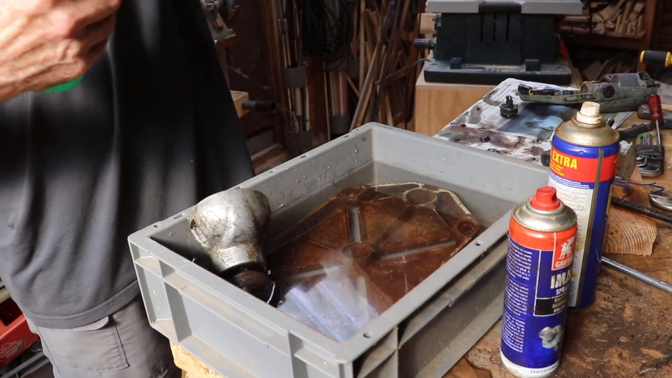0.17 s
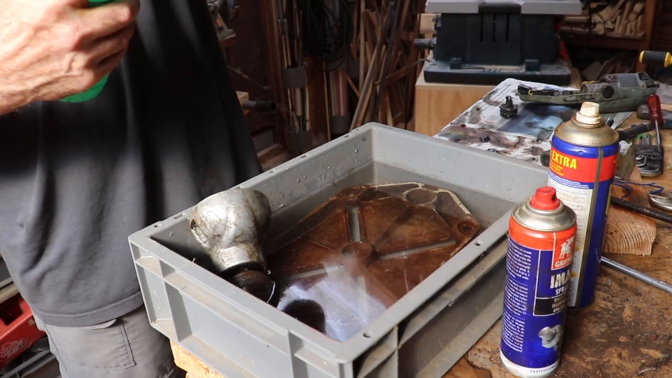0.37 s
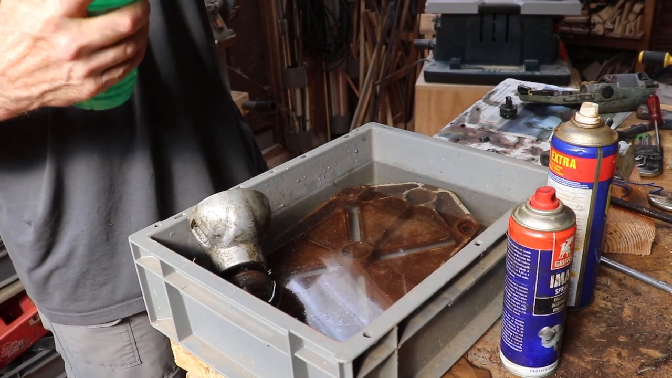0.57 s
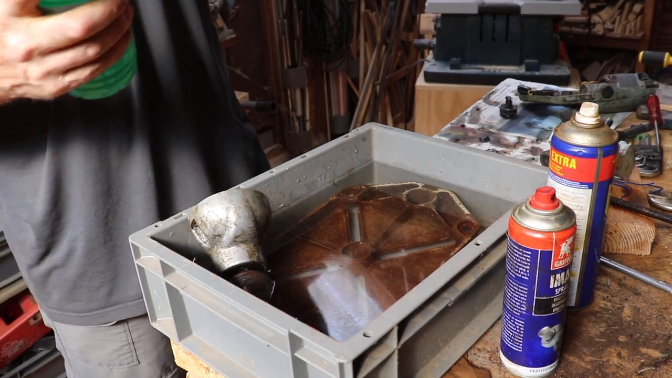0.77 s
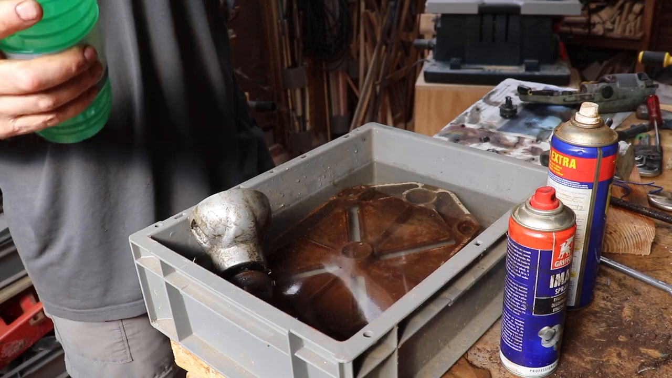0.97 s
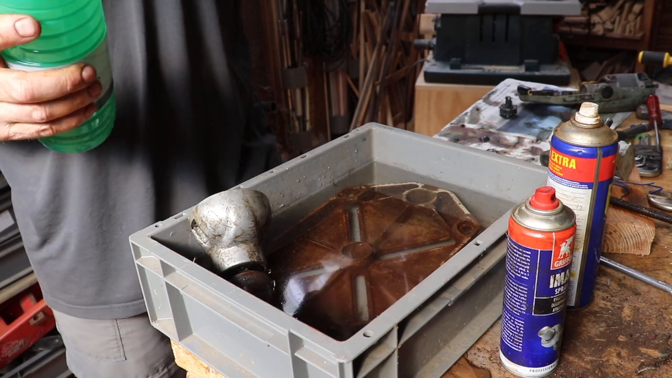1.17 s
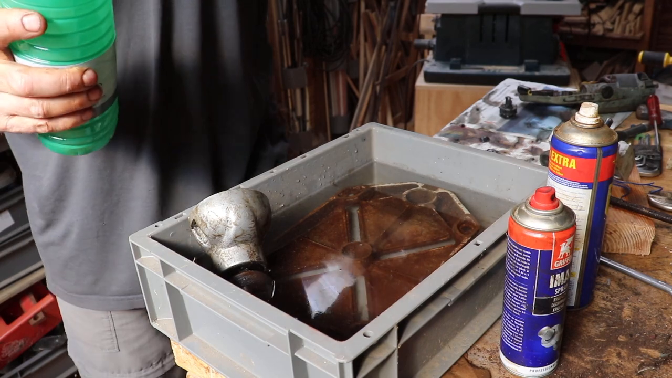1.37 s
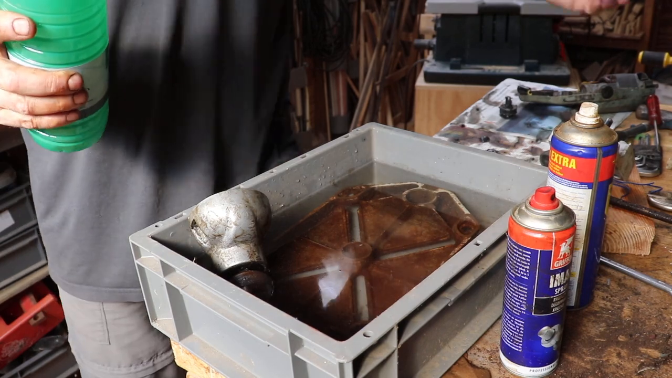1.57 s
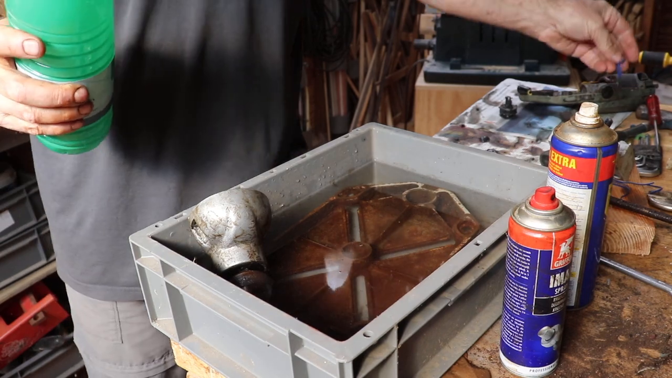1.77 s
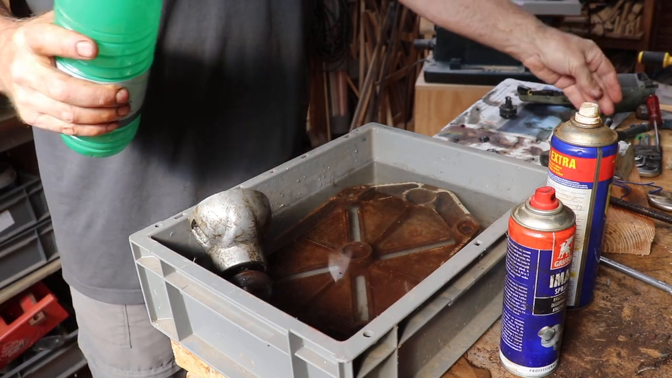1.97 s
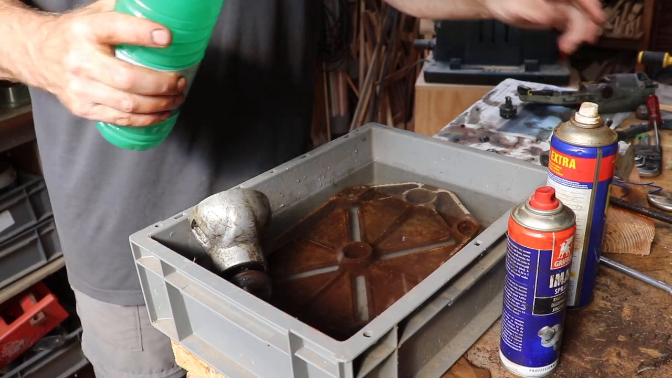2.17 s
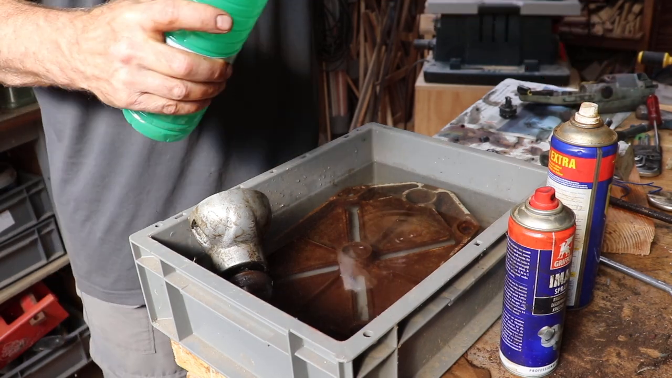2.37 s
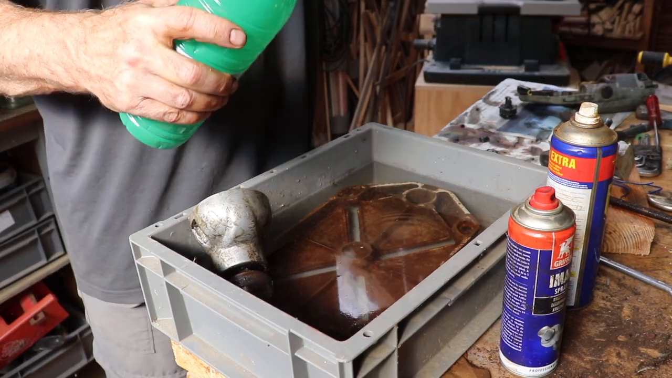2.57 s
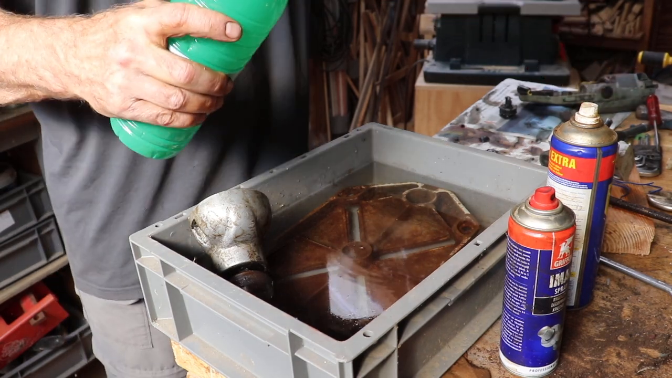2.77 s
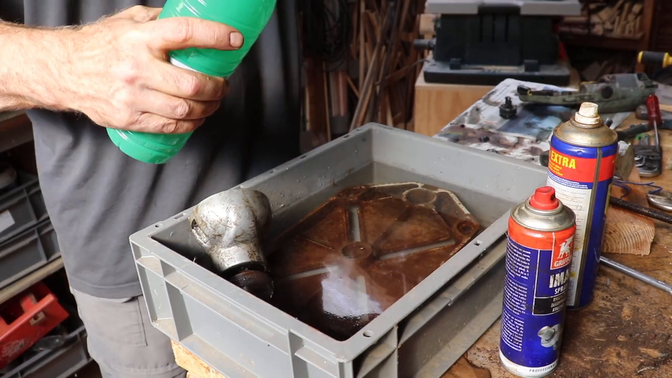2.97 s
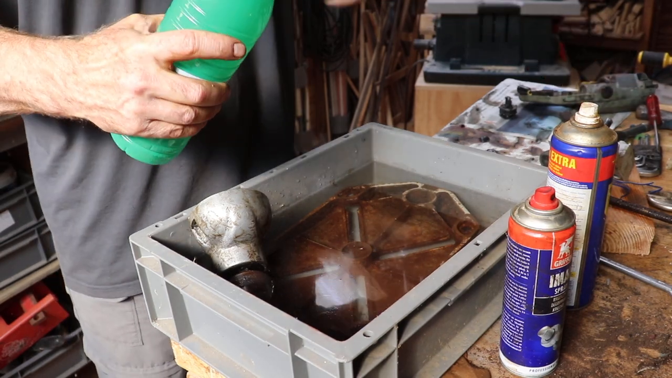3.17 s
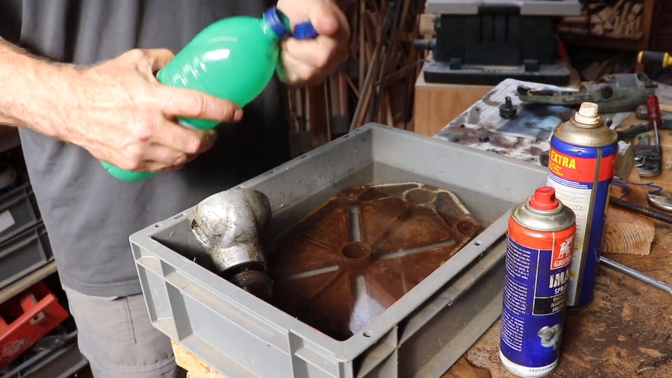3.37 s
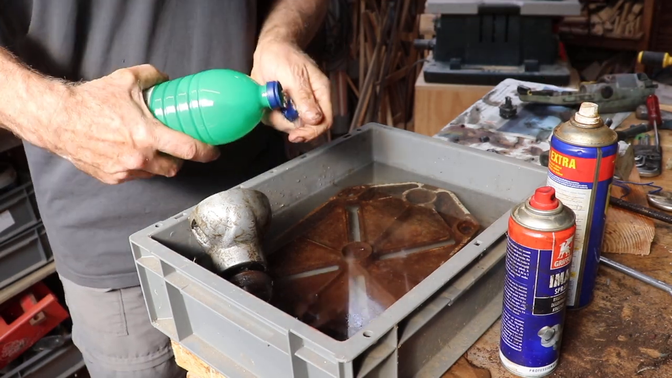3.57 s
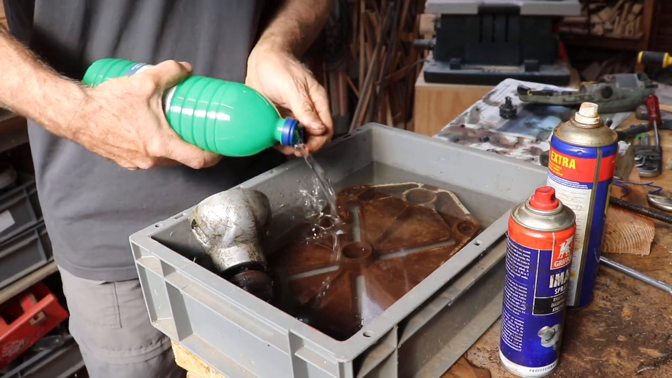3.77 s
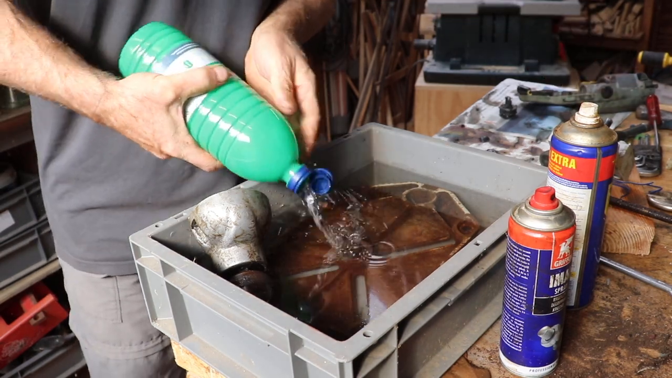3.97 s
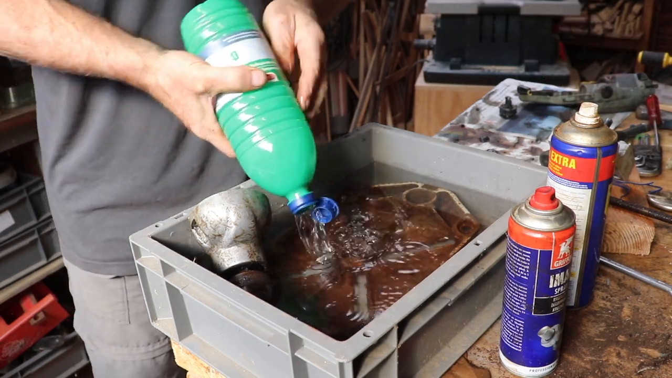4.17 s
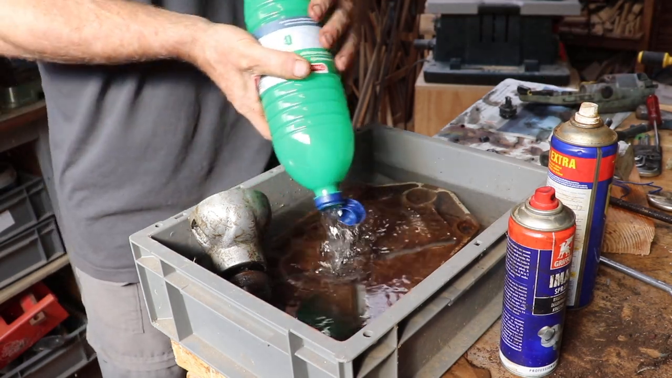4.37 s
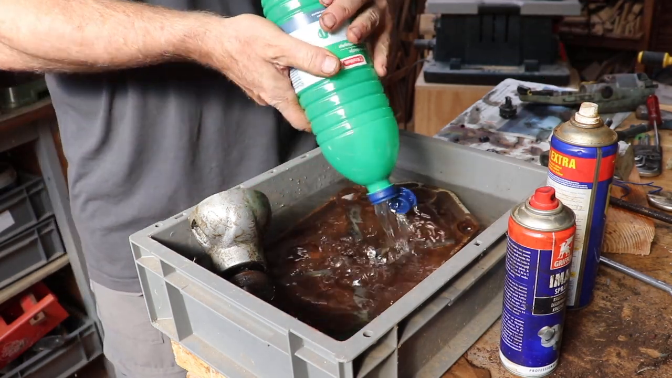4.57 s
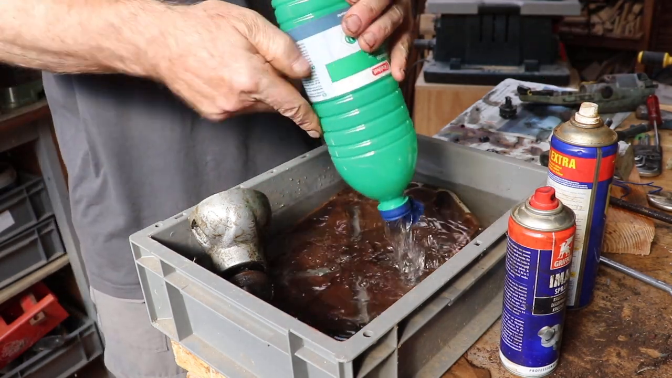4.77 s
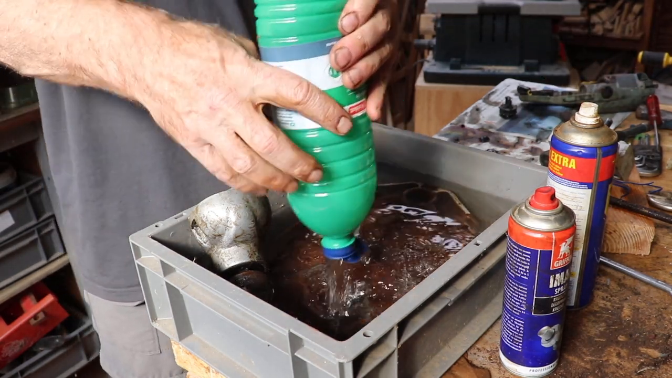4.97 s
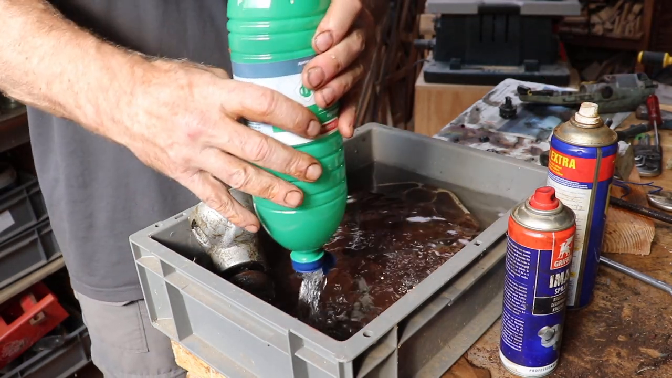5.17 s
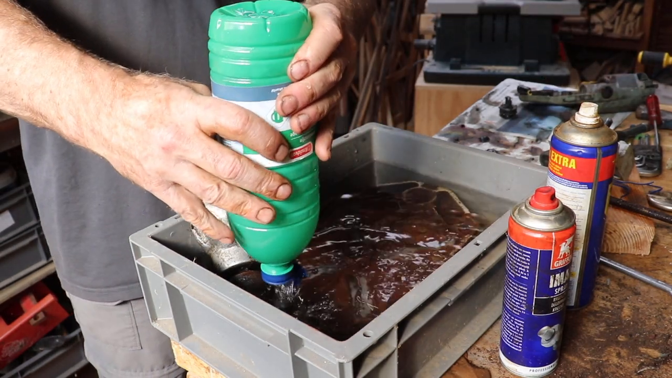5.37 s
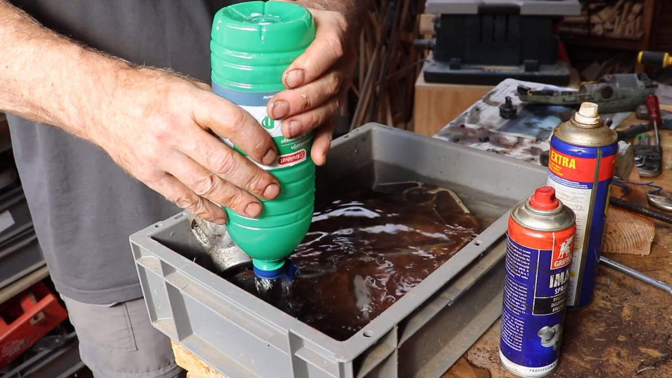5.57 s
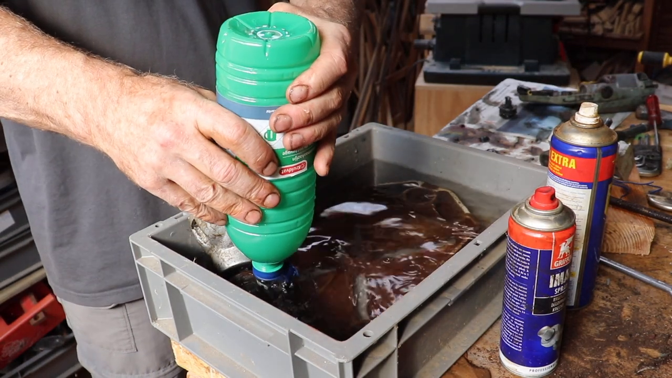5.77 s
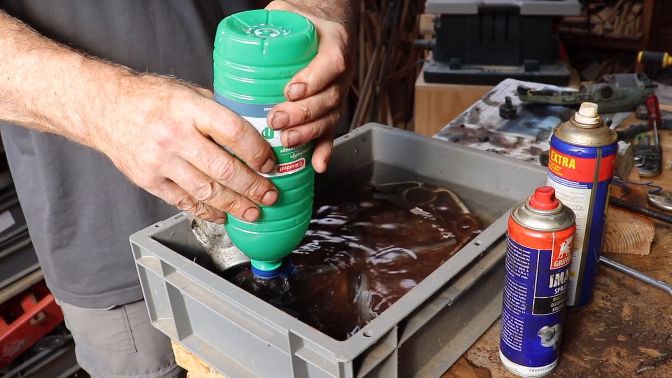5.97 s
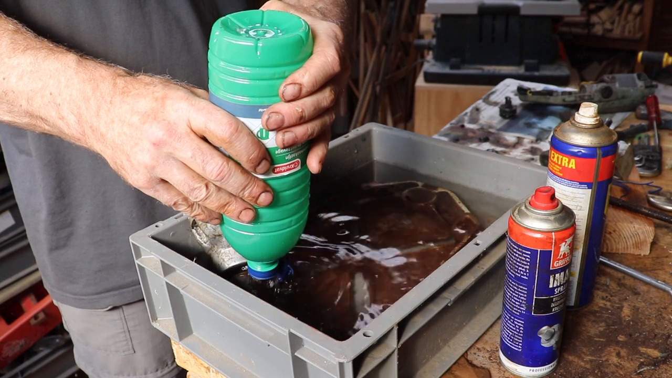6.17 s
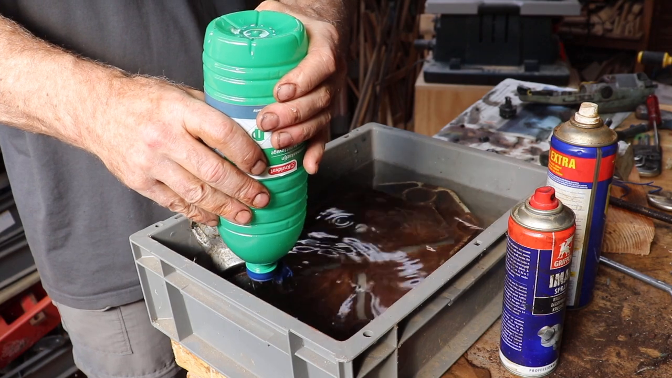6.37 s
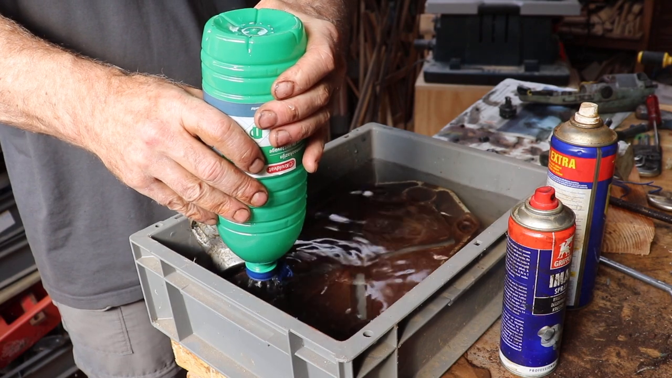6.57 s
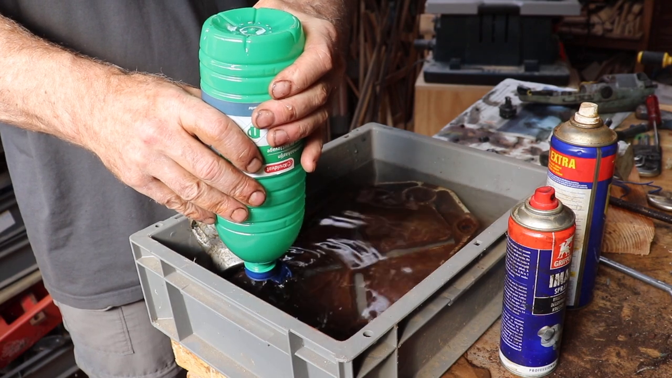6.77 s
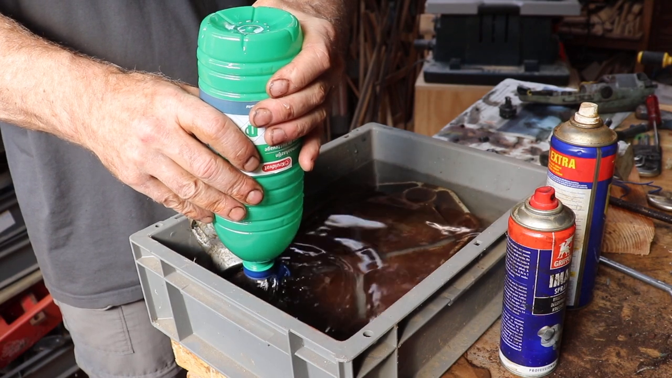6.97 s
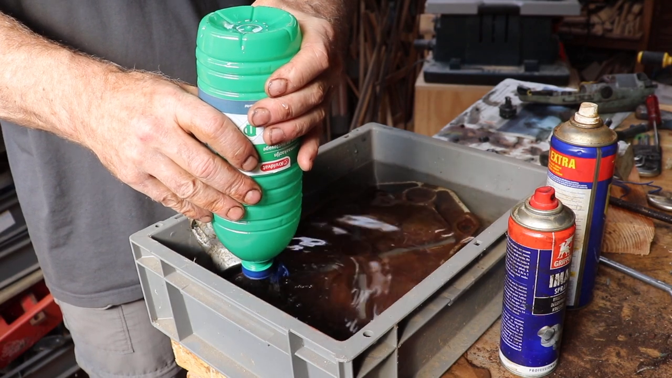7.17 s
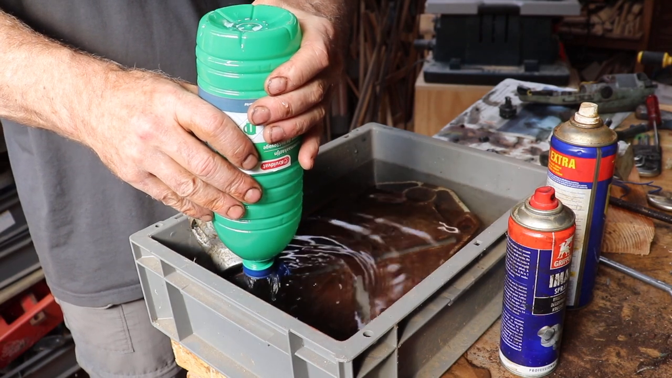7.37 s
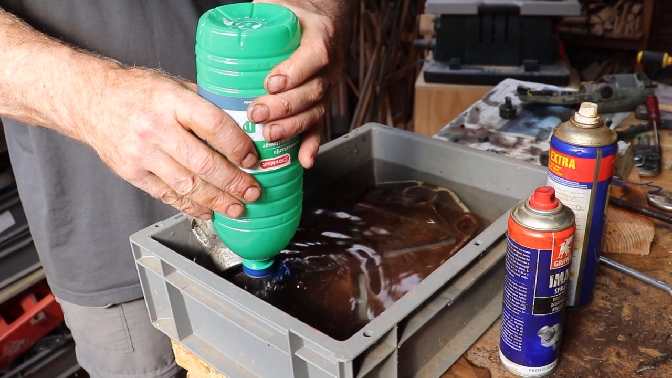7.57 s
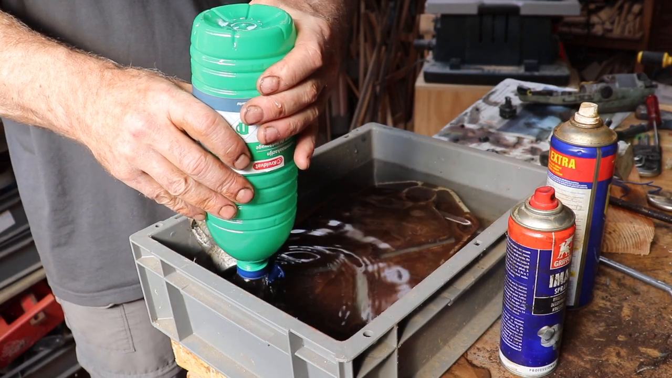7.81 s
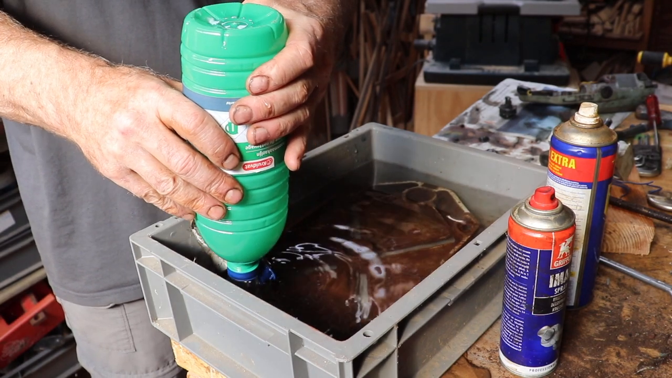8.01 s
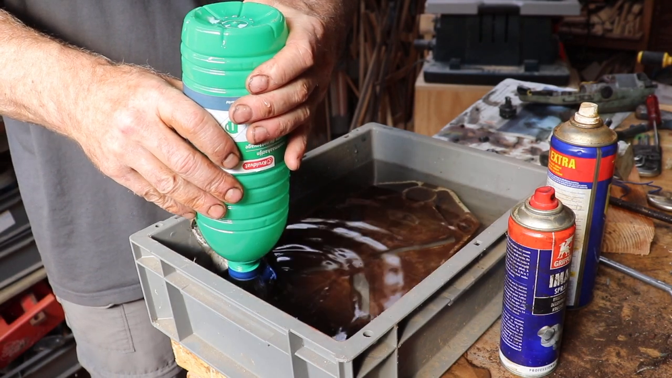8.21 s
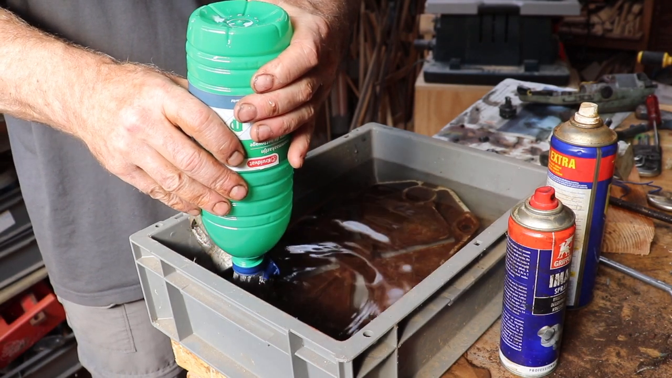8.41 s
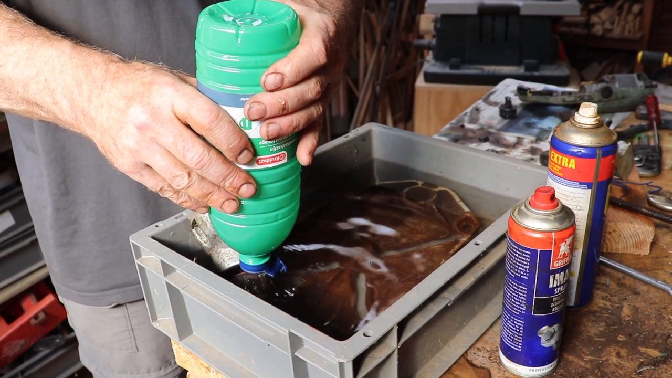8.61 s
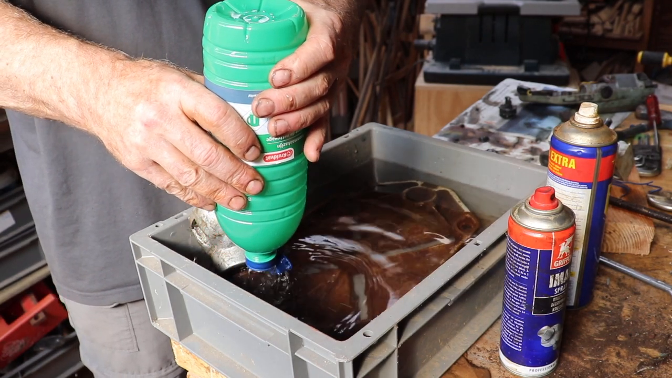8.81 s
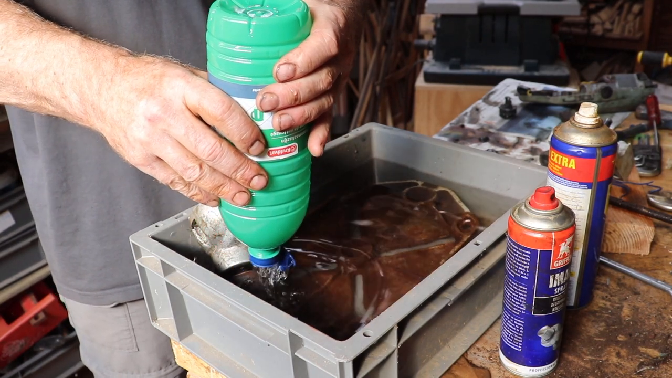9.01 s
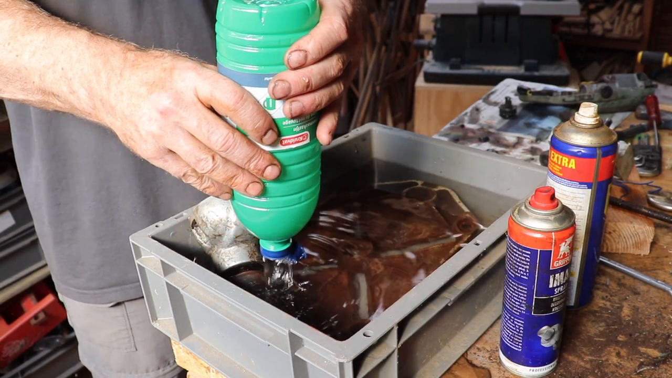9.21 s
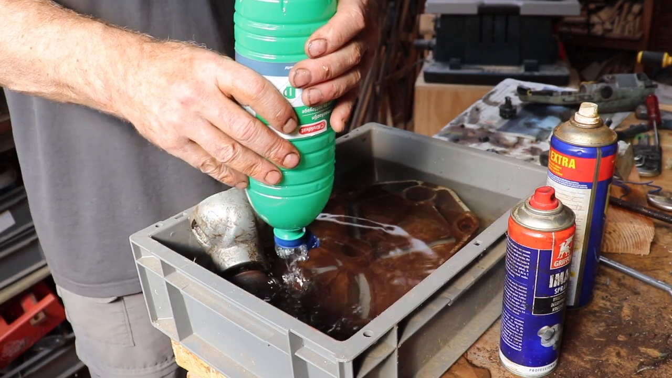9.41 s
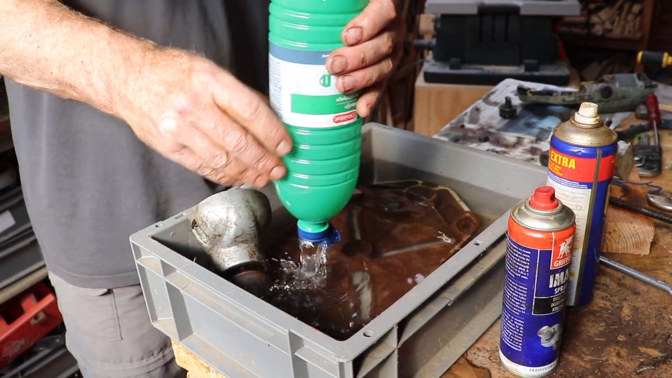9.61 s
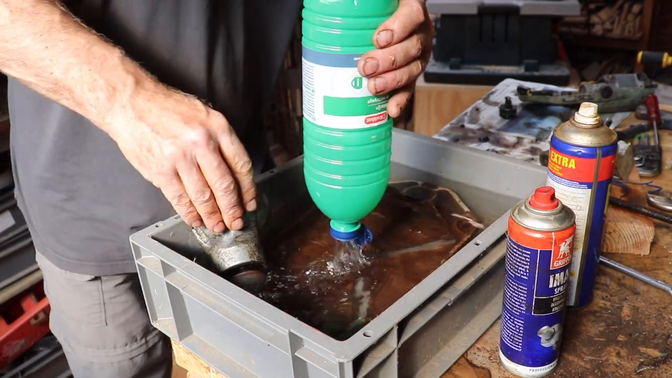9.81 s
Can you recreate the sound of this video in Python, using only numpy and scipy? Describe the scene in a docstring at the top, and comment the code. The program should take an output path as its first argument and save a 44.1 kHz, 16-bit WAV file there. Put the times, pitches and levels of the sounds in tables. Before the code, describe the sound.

Over faint workshop air, hands softly rub and bump a plastic bottle. Between about 0.5 and 0.9 seconds come a dull knock and several dry clicks as the cap is worked. More rubbing follows around 2.6 seconds, then a hollow knock at 2.8, a sharp crack of buckling plastic at 3, and two light taps.

At about 3.8 seconds liquid starts falling into a crate already holding liquid, building to a splashing stream with bright spatter, strongest from 4.2 to 5.4. The bottle cracks again near 5.8. From about 5.5 the pour becomes uneven glugging, several gulps a second, with low notes, wet slaps and ringing bubbles. From 8.6 it turns a little splashier and keeps glugging until the end, near 10 seconds. The crate rings faintly along with the liquid. The room is small and fairly dry, heard through a stereo pair of microphones.

```python
"""Bottle emptied into a crate

A small workshop, on a stereo pair of microphones. A plastic bottle is handled and unscrewed, then
upturned over a crate that holds liquid. The stream splashes from a height; with the neck lowered to
the surface it glugs: air gulps set a low note ringing, slugs of liquid slap down and bubbles ring.
The air in the crate rings along, and nearby walls and clutter answer briefly."""
import sys
import numpy as np
from scipy import signal
from scipy.fft import rfft, irfft, next_fast_len
from scipy.io import wavfile
from scipy.ndimage import map_coordinates

SR = 44100
rng = np.random.default_rng(int(sys.argv[2]) if len(sys.argv) > 2 else 0)


def file_out(sig):
    """Save sig as 16-bit WAV at sys.argv[1]."""
    # one column per channel
    cols = np.atleast_2d(sig).T
    # limit, then scale
    lim = np.clip(cols, -1, 1)
    pcm = np.round(lim * 32767).astype(np.int16)
    wavfile.write(sys.argv[1], SR, pcm)


N = 434385

# Noise colours. Each row: frequency in Hz, relative level in dB.
AIR_SPECTRUM = [(60, -4), (140, -7), (260, -12.5), (470, -17.5), (1100, -15.5), (2600, -14), (8000, -18),
                (16000, -29)]  # still workshop air
RUMBLE_SPECTRUM = [(60, -4), (180, -26), (900, -90)]  # the room's low rumble
BUMP_SPECTRUM = [(80, -5), (200, -3), (380, -3), (600, -7), (1000, -9.5), (2500, -25.5), (6000, -70)]  # hands against the bottle
RUB_SPECTRUM = [(600, -13), (2000, -1), (3000, 2.5), (5000, 0), (7500, 1.5), (11000, -1.5), (16000, -15)]  # fingers and cap sliding on plastic
CHURN_SPECTRUM = [(80, -47), (190, 6), (300, -5), (430, -8), (600, -0.5), (900, -0.5), (1800, -13.5)]  # deep churning in the pool
SPLASH_SPECTRUM = [(150, -62), (450, 3), (950, -5.5), (2000, -1.5), (3500, 1), (5000, -9.5), (9000, -4.5)]  # the stream hitting the surface
SPRAY_SPECTRUM = [(600, -65), (2500, -14.5), (5800, -2.5), (8000, -4.5), (11000, -4), (16000, -22)]  # fine drops thrown up
# The rumble's slow drift. Each row: time in seconds, level in dB.
RUMBLE_LEVELS = [(0, -57), (2.3, -61.5), (4.8, -52), (8.8, -66), (9.85, -62)]
# The workshop's decay. Each row: frequency in Hz, time to fall 60 dB in seconds.
ROOM_T60 = [(150, 0.17), (500, 0.18), (1400, 0.17), (3700, 0.16), (10000, 0.14), (16000, 0.059)]
# Diffuse sound at the pair. Each row: frequency in Hz, left-right correlation.
MIC_CORRELATION = [(60, 0.85), (300, 0.86), (1000, 0.35), (2500, 0), (6000, 0)]
# The microphones' colour. Each row: frequency in Hz, left minus right in dB.
MIC_BALANCE = [(500, 0), (2000, -1), (5000, -0.5), (12000, 1.5)]

# Hands bumping the bottle. Each row: time in seconds, relative level in dB.
BUMP_LEVELS = [(0, -39), (0.1, -44), (0.35, -46), (0.9, -42), (1.3, -50.5), (1.6, -45.5), (2.45, -50),
               (2.75, -49), (3.5, -47), (3.9, -51)]
# Strokes of fingers and cap. Each row: middle in seconds, length in seconds, level in dB.
RUBS = [(0.01, 0.059, -40.5), (0.179, 0.1, -43), (0.308, 0.073, -47.5), (0.662, 0.031, -35),
        (1.563, 0.025, -48.5), (2.57, 0.028, -40), (2.624, 0.039, -37.5), (2.72, 0.064, -40),
        (3.214, 0.014, -35), (3.6, 0.031, -40.5)]
# Snaps of plastic. Each row: start in seconds, ring pitch in Hz, ring, thud and tick levels in dB.
CLICKS = [(0.478, 1800, -40, -39, -38.5), (0.604, 2570, -37.5, -59, -58), (0.644, 2530, -31, -35.5, -22),
          (0.688, 2510, -37.5, -43, -39), (0.9152, 2270, -40.5, -45, -51), (3.215, 3180, -34.5, -42, -37),
          (3.361, 2330, -45, -70, -41)]  # dry clicks
WALL_CRACKS = [(3.0384, 1990, -12, -18.5, -21.5), (3.0411, 2120, -24, -31, -30),
               (5.75, 3400, -13.5, -23.5, -32), (5.7524, 3200, -16.5, -29.5, -36)]  # the bottle's wall buckling
# Dull knocks. Each row: start in seconds, level in dB, cut-off in Hz (low for a soft contact).
KNOCKS = [(0.454, -28, 610), (1.565, -41.5, 2000), (2.801, -25.5, 3970), (2.813, -28.5, 3000),
          (2.823, -29, 3000), (2.848, -35, 2000)]
# Resonances. Each row: frequency in Hz, width in Hz, gain in dB.
BODY_MODES = [(224, 144, -1.5), (402, 90, 2.5), (680, 300, -1.5), (930, 180, 3.5), (1270, 130, 2),
              (2230, 6000, -12.5)]  # the knocked body
CRATE_MODES = [(461.5, 24, 5.5), (655, 16, 2.5), (820, 41, 4), (920, 66, -2.5), (1130, 65, -9),
               (1326, 83, -5.5)]  # the air in the crate
# Light taps on a ringing part. Each row: start in seconds, level in dB.
TAPS = [(3.211, -43), (3.363, -38.5)]
# That part's modes. Each row: frequency in Hz, gain in dB, time to fall 60 dB in seconds.
TAP_MODES = [(813, 3, 0.1), (2400, 11.5, 0.013), (2860, -1, 0.013)]

# The steady stream. Each row: time in seconds, level in dB.
FLOW_LEVELS = [(3.8, -45), (4.05, -39.5), (4.6, -42.5), (5.0, -42.5), (5.3, -34), (5.55, -49), (6.1, -41),
               (6.45, -50), (6.9, -47.5), (7.45, -53), (8.2, -48.5), (8.8, -53), (9.3, -49), (9.85, -46)]
# The neck's distance from the pool. Each row: time in seconds, height in cm.
NECK_HEIGHT = [(3.7, 1.7), (4.7, 6.3), (5.3, 4.2), (6.0, 0.53), (8.0, 0.73), (8.7, 5), (9.1, 1.3),
               (9.85, 8)]
# Slugs plunging in. Each row: start in seconds, hold in seconds, splash level in dB, churn level in dB.
GUSHES = [(4.196, 0.095, -43, -39), (4.401, 0.12, -37.5, -47), (4.666, 0.07, -37, -40),
          (4.755, 0.15, -38.5, -47.5), (5.086, 0.02, -36, -45), (5.444, 0.034, -39.5, -42),
          (5.639, 0.014, -54, -33), (5.753, 0.067, -38.5, -40.5), (6.005, 0.06, -45, -33.5),
          (6.166, 0.11, -39, -38), (6.728, 0.0073, -41.5, -40.5), (6.814, 0.029, -44, -43.5),
          (6.948, 0.013, -41.5, -39.5), (7.502, 0.022, -41.5, -44), (7.733, 0.036, -35.5, -45),
          (8.062, 0.042, -45.5, -43), (8.284, 0.061, -45, -45.5), (8.582, 0.026, -39.5, -36),
          (8.876, 0.11, -47, -49), (9.033, 0.093, -40.5, -47), (9.622, 0.064, -41, -52)]
# Spatter landing on the pool. Each row: start in seconds, pitch in Hz, level in dB.
SPATTERS = [(4.243, 6500, -17), (4.371, 6300, -22), (5.172, 4680, -21), (5.471, 5180, -21),
            (5.848, 6050, -22.5), (6.279, 2800, -23), (6.478, 4940, -30.5), (6.738, 5400, -30),
            (6.754, 6240, -28), (6.838, 4550, -27), (7.2058, 7500, -29.5), (7.241, 8300, -28),
            (7.287, 8000, -27), (7.4885, 8000, -27), (7.919, 3050, -31), (7.863, 6650, -30.5),
            (8.628, 4960, -26), (8.88, 8700, -25), (9.035, 4770, -20.5), (9.127, 4430, -26),
            (9.161, 3740, -24.5), (9.247, 7150, -26), (9.408, 6000, -25.5), (9.634, 5370, -30),
            (9.665, 4270, -21.5), (9.765, 4320, -27.5), (9.801, 5640, -24)]
# Liquid slapping the surface. Each row: start in seconds, ring pitch in Hz, ring level in dB.
SLAPS = [(3.815, 4900, -35.5), (3.906, 2410, -28), (3.922, 2840, -25), (4.28, 3050, -26),
         (4.332, 5500, -28.5), (4.3578, 5300, -25), (4.474, 3600, -19), (4.62, 2800, -18.5),
         (4.688, 3140, -19), (4.695, 2560, -17.5), (4.71, 2040, -19), (4.86, 1340, -18.5),
         (4.9926, 2880, -20.5), (5.112, 2480, -17.5), (5.429, 1110, -26.5), (5.537, 2680, -28.5),
         (6.207, 1470, -26), (6.228, 1380, -29), (6.766, 910, -26.5), (6.913, 2360, -27),
         (7.501, 2180, -38), (7.708, 3950, -29.5), (7.756, 2050, -18), (8.273, 1280, -29),
         (8.403, 1880, -31.5), (8.457, 2700, -29), (8.502, 4200, -27.5), (8.211, 4200, -33.5),
         (8.3153, 3230, -30.5), (8.672, 3980, -34.5), (9.359, 4860, -35), (9.588, 1660, -24.5),
         (9.611, 1730, -21.5)]
# Air dragged under. Each row: start in seconds, length in seconds, lowest pitch in Hz, relative dB.
CHIRPS = [(4.176, 0.042, 1047, -32), (4.212, 0.05, 1747, -32), (4.416, 0.022, 2285, -24.5),
          (4.593, 0.03, 2590, -29), (4.642, 0.014, 2950, -21), (4.774, 0.017, 2410, -26),
          (4.793, 0.027, 1965, -23.5), (5.626, 0.044, 660, -32), (6.015, 0.06, 800, -26)]
# Runs of growing bubbles. Each row: start and length in seconds, first and last pitch in Hz, level in dB.
GURGLES = [(5.273, 0.056, 1200, 770, -35.5), (5.649, 0.026, 1200, 780, -39), (6.176, 0.062, 1130, 920, -27),
           (6.202, 0.04, 1930, 1425, -18.5), (6.692, 0.03, 1560, 1250, -25), (6.952, 0.028, 1250, 880, -27),
           (7.107, 0.035, 1790, 930, -26), (7.737, 0.022, 2100, 1280, -21)]
# The largest bubbles. Each row: start in seconds, pitch in Hz, relative level in dB, life in cycles.
BUBBLES = [(3.92, 487, -28, 29), (3.98, 4840, -12, 26), (4.247, 2360, -16, 22), (4.275, 1770, -14.5, 29),
           (4.418, 1700, -18, 31), (4.544, 3020, -18, 32), (5.113, 2220, -15.5, 54),
           (5.212, 1590, -17.5, 23), (5.321, 878, -21.5, 63), (5.428, 1197, -18.5, 80),
           (5.638, 3090, -24.5, 40), (5.652, 1160, -24, 34), (5.841, 3890, -20, 98), (5.888, 953, -15, 22),
           (5.967, 1244, -14.5, 27), (5.998, 1020, -17.5, 28), (6.021, 1880, -28, 36),
           (6.049, 2420, -26, 58), (6.209, 492, -30.5, 42), (6.226, 1500, -17, 30), (6.33, 1480, -26.5, 21),
           (6.54, 718, -22.5, 56), (6.574, 2360, -26.5, 45), (6.767, 1004, -18.5, 33),
           (6.81, 2440, -17, 32), (6.854, 1840, -17, 38), (6.883, 2050, -18, 14), (6.914, 2010, -14, 27),
           (6.955, 1370, -19.5, 18), (6.974, 2085, -17, 40), (7.115, 1490, -22, 37),
           (7.243, 780, -35.5, 50), (7.324, 2700, -23, 25), (7.42, 3750, -30.5, 47), (7.5, 4010, -19.5, 73),
           (7.55, 3890, -24.5, 87), (7.735, 1027, -20, 48), (7.742, 2090, -25, 34), (7.868, 1360, -19, 27),
           (7.959, 1365, -26.5, 40), (8.043, 1400, -26, 39), (8.142, 3810, -21.5, 53),
           (8.231, 2300, -25, 22), (8.2699, 1210, -14.5, 27), (8.404, 790, -16.5, 10.5),
           (8.406, 443, -31.5, 35), (8.589, 1970, -15, 32), (8.587, 983, -29, 62), (8.672, 3640, -22.5, 38),
           (8.732, 492, -33.5, 23), (8.894, 907, -23.5, 59), (8.948, 3100, -22.5, 67),
           (8.997, 2900, -22.5, 69), (9.042, 1945, -16, 29), (9.092, 690, -30.5, 36),
           (9.247, 545, -34.5, 27), (9.509, 1370, -29, 34), (9.574, 477, -33.5, 27), (9.593, 1660, -13, 35),
           (9.675, 915, -24, 28), (9.746, 1405, -22.5, 41), (9.84, 2500, -27, 35)]
# Air gulped in at the neck. Each row: start in seconds, snap pitch in Hz, snap level in dB.
GULPS = [(4.163, 2130, -27.5), (4.588, 2060, -43), (4.745, 2400, -31), (4.837, 2500, -24),
         (5.575, 1820, -32.5), (5.649, 1190, -47), (5.966, 1240, -33), (6.152, 1860, -26),
         (6.175, 1480, -28), (6.376, 1800, -39), (6.514, 1790, -34), (6.681, 1650, -31),
         (6.851, 1690, -22.5), (7.074, 1820, -31.5), (7.216, 1890, -41), (7.347, 1930, -55),
         (7.661, 1850, -26.5), (7.863, 1780, -27.5), (7.958, 1260, -32.5), (8.064, 2130, -27),
         (8.184, 3100, -34), (8.546, 2600, -27), (8.818, 1940, -26.5), (9.012, 1850, -33),
         (9.082, 3330, -26), (9.373, 2000, -26), (9.569, 1780, -31.5), (9.745, 1310, -27)]

DROP_RISE, BUBBLE_RISE = 0.13, 0.34  # pitch climb as a share: small drops, and the most for large bubbles


def amp(db):
    return 10 ** (np.asarray(db) / 20)


def unit(x):
    return x / np.sqrt(np.mean(x ** 2) + 1e-20)


def seconds(length):
    return np.arange(int(length * SR)) / SR


def fade(t, t60):
    return np.exp(-np.log(1000) * t / t60)


def along(points, hz):
    """Read (Hz, value) points on a log frequency axis."""
    f, v = np.transpose(points)
    return np.interp(np.log(hz + 1), np.log(f), v)


def curve(points):
    """Join (seconds, value) points into one value per sample."""
    return np.interp(np.arange(N) / SR, *np.transpose(points))


def wobble(rate):
    """A smooth random curve, rate knots a second."""
    return map_coordinates(rng.standard_normal(int(N * rate / SR) + 4), [np.arange(N) * rate / SR])


def filtered(x, response):
    """Pass x through a response given as a function of Hz."""
    n = x.shape[-1]
    padded = next_fast_len(n + n // 10)
    return irfft(rfft(x, padded) * response(np.fft.rfftfreq(padded, 1 / SR)), padded)[..., :n]


def resonance(f, hz, width):
    return 1j * f * width / (hz * hz - f * f + 1j * f * width)


def coloured(x, spectrum):
    return unit(filtered(x, lambda hz: amp(along(spectrum, hz))))


def add(track, s, sound, pan_db=0):
    """Mix a sound in at s seconds; positive pan_db favours the left microphone."""
    start = max(0, round(s * SR))
    part = sound[:max(0, N - start)]
    track[:, start:start + len(part)] += amp([[pan_db / 2], [-pan_db / 2]]) * part


def from_left(x, lead_s):
    """A source on the left reaches that microphone first."""
    return filtered(x, lambda f: np.exp(1j * np.pi * f * lead_s * np.array([[1], [-1]])))


def diffuse(pair):
    """Two unrelated signals become a pair that is alike in the bass."""
    turn = lambda hz: np.arccos(np.clip(along(MIC_CORRELATION, hz), -1, 1)) / 2
    mid, side = filtered(pair, lambda hz: np.array([np.cos(turn(hz)), np.sin(turn(hz))]))
    return np.array([mid + side, mid - side])


def rush(spectrum):
    """Diffuse noise of rms 1."""
    return coloured(diffuse(rng.standard_normal((2, N))), spectrum)


def bubble(t, hz, t60, rise):
    """A pocket of air rings, holding briefly, and climbs in pitch as it nears the surface."""
    glide = t + rise * (t * t / t60 - t / 4) / 2
    envelope = fade((t / t60) ** 1.5, 0.86) * (1 - np.exp(-2 * hz * t))
    return np.sin(2 * np.pi * hz * glide) * envelope


def fizz(low_hz, high_hz, cycles, spread_db, count):
    """A swarm of small bubbles of random pitch, size and place, rms 1."""
    when, pitch, size, life, place = rng.random((count, 5)).T[:, :, None]
    hz = low_hz * (high_hz / low_hz) ** pitch
    t = seconds(min(cycles / low_hz, .05))
    rings = amp(-spread_db * np.log(size + 0.048)) * bubble(t, hz, cycles / hz * (.5 + life), DROP_RISE)
    samples = (when * N).astype(int) + np.arange(len(t))
    angle = np.pi / 4 + 0.39 * (place - .5)
    sides = rings * np.cos(angle), rings * np.sin(angle)
    return unit(np.array([np.bincount(samples.ravel(), side.ravel(), N)[:N] for side in sides]))


def burst(response, t60, grit):
    """A sharp push and a brief rattle through a resonance; rms 1 when spread over 5 ms."""
    t = seconds(.05)
    push = grit * rng.standard_normal(len(t)) * fade(t, t60)
    push[0] += 1
    sound = filtered(push, response)
    return sound / np.sqrt(np.sum(sound ** 2) / (SR / 200))


def impacts(rows, t60, grit, width, thud_hz, tick_hz, pan_db, tick_t60):
    """Each impact has a ringing middle, a low thud and a bright tick."""
    out = np.zeros((2, N))
    for s, hz, ring_db, thud_db, tick_db in rows:
        ring = burst(lambda f: resonance(f, hz, width * hz) ** 2, t60, grit)
        thud = burst(lambda f: resonance(f, thud_hz, 2.24 * thud_hz) ** 2, t60, grit / 2)
        tick = burst(lambda f: resonance(f, tick_hz, 1.5 * tick_hz) ** 2, tick_t60, grit)
        add(out, s, amp(ring_db) * ring + amp(thud_db) * thud, pan_db + rng.standard_normal())
        add(out, s, amp(tick_db) * tick, 2 * rng.standard_normal())
    return out


def room_tone():
    """Still workshop air all round the microphones, over a low rumble that slowly swells and sinks."""
    return amp(-51.5) * rush(AIR_SPECTRUM) + amp(curve(RUMBLE_LEVELS)) * rush(RUMBLE_SPECTRUM)


def room_tail(x):
    """The workshop's short diffuse tail, new every half second, as from a moving source."""
    out, block = np.zeros((2, N)), SR // 2
    for start in range(0, N, block):
        hz, t, noise = signal.stft(rng.standard_normal((2, SR // 3)), SR, nperseg=256)
        tail = signal.istft(noise * fade(t, along(ROOM_T60, hz)[:, None]), SR, nperseg=256)[1]
        tail /= np.linalg.norm(tail[0])
        wet = signal.fftconvolve(x[:1, start:start + block], tail, axes=1)[:, :N - start]
        out[:, start:start + wet.shape[1]] += wet
    return diffuse(out)


def wall_echo(x, delay_s=0.0144, gain=0.18, cutoff_hz=2500):
    """A dull early echo from a nearby wall."""
    return filtered(x, lambda f: gain * np.exp(-2j * np.pi * f * delay_s) / (1 + 1j * f / cutoff_hz))


def crate_ring(x):
    """The air in the crate rings on after each sound of the liquid."""
    return filtered(x, lambda f: sum(amp(db) * resonance(f, hz, width) for hz, width, db in CRATE_MODES))


def bottle_handling(swing_db=2):
    """Fingers bump the bottle and rub over it in short, gritty strokes."""
    t = np.arange(N) / SR
    strokes = sum(amp(db) * np.exp(-2 * ((t - s) / length) ** 2) for s, length, db in RUBS)
    rub = strokes * unit(amp(2.9 * wobble(240))) * rush(RUB_SPECTRUM)
    bump = amp(curve(BUMP_LEVELS) - 3 + swing_db * wobble(25)) * rush(BUMP_SPECTRUM)
    return rub + bump


def hollow_body(f):
    """The knocked body's response: its modes add with alternating sign."""
    return sum((-1) ** k * amp(db) * resonance(f, hz, width)
               for k, (hz, width, db) in enumerate(BODY_MODES))


def knocks():
    """Dull blows on a hollow body, and light ringing taps."""
    out, t = np.zeros((2, N)), seconds(.25)
    for s, db, cutoff_hz in KNOCKS:
        blow = burst(lambda f: hollow_body(f) / (1 + 1j * f / cutoff_hz) ** 2, t60=0.13, grit=0.91)
        add(out, s, amp(db) * blow)
    tap = sum(amp(db) * np.sin(2 * np.pi * hz * t) * fade(t, t60) for hz, db, t60 in TAP_MODES)
    for s, db in TAPS:
        add(out, s, amp(db) * tap)
    return out


def plastic_snaps():
    """The plastic clicks drily, a little to the left, and the bottle's wall buckles in quick cracks."""
    clicks = impacts(CLICKS, t60=0.028, grit=0.28, width=1.0,
                     thud_hz=513, tick_hz=7700, pan_db=3.5, tick_t60=0.02)
    cracks = impacts(WALL_CRACKS, t60=0.013, grit=0.22, width=1.0,
                     thud_hz=420, tick_hz=8800, pan_db=-1.0, tick_t60=0.011)
    return clicks + cracks


def foam(level_db=-63):
    """Once the pool is stirred up, tiny bubbles keep bursting at its surface."""
    stirred = np.clip(np.arange(N) / SR - FLOW_LEVELS[0][0], 0, 1)
    return amp(level_db) * stirred * fizz(8100, 12800, cycles=34, spread_db=8.5, count=130)


def spatters(scatter_s=0.022, spread_octaves=0.52, cycles=40, below_db=-3, tick_db=-15, count=4):
    """A leading drop lands with a tick and a ring; smaller drops of nearby pitch follow close behind."""
    out, t = np.zeros((2, N)), seconds(.03)
    for s, hz, db in SPATTERS:
        tick = burst(lambda f: resonance(f, hz, 2.9 * hz) ** 2, t60=0.0053, grit=0.045)[:len(t)]
        leader = bubble(t, hz, cycles / hz, DROP_RISE) + amp(tick_db) * tick
        add(out, s, amp(db) * leader, 2 * rng.standard_normal())
        for delay, pitch, size, place in rng.random((count, 4)):
            drop_hz = hz * 2 ** (spread_octaves * (2 * pitch - 1))
            drop = amp(db + below_db - 10 * size) * bubble(t, drop_hz, cycles / drop_hz, DROP_RISE)
            add(out, s + scatter_s * delay, drop, 10 * (place - .5))
    return out


def chirps(climb=0.297, spacing=0.54, step_db=-4, rough_db=5, count=3):
    """Pockets of air swell in together and glide up, jolted by the stream; the higher ones are weaker."""
    out = np.zeros((2, N))
    for s, length, lowest_hz, db in CHIRPS:
        t = seconds(length)
        swell = np.sin(np.pi * np.sqrt(t / length))
        glide = t + climb * t * t / length / 2
        for k, (delay, pitch, place) in enumerate(rng.random((count, 3))):
            hz = lowest_hz * (1 + spacing * k * (1 + (pitch - .5) / 2))
            jolts = map_coordinates(rng.standard_normal(32), [t * 350])
            ring = amp(rough_db * jolts) * swell * np.sin(2 * np.pi * hz * glide + jolts)
            start = s + length * delay * k / count / 2
            add(out, start, amp(db + step_db * k - 4) * ring, 4 * (place - .5))
    return out


def gurgles(cycles=28, scatter_octaves=0.17, count=5):
    """A closing hollow sheds a falling run of bubbles, each curling upward in pitch."""
    out, t = np.zeros((2, N)), seconds(.1)
    for s, length, first_hz, last_hz, db in GURGLES:
        for k, (delay, pitch, rise) in enumerate(rng.random((count, 3))):
            progress = (k + delay) / count
            hz = first_hz * (last_hz / first_hz) ** progress * 2 ** (scatter_octaves * (2 * pitch - 1))
            add(out, s + length * progress, amp(db) * bubble(t, hz, cycles / hz, rise / 2), pan_db=-1)
    return out


def gush(t, s, length, rise_s=0.012, t60=0.19):
    """One slug of liquid swells quickly and holds, then its foam dies away."""
    return np.clip((t - s) / rise_s + 1, 0, 1) * fade(np.clip(t - s - length, 0, 1), t60)


def stream(steady_churn_db=-8.5, spray_db=-6, spray_db_per_cm=1.014, full_flow_db=-40):
    """Stream and gushes churn the pool: swarms of bubbles on a hiss that thickens with the fall."""
    t = np.arange(N) / SR
    height_cm = curve(NECK_HEIGHT)
    flow = amp(curve(FLOW_LEVELS)) * np.interp(t, [3.68, 3.88], [0, 1])
    splashing, churning = flow, amp(steady_churn_db) * flow
    for s, length, splash_db, churn_db in GUSHES:
        shape = gush(t, s, length)
        splashing = np.maximum(splashing, amp(splash_db) * shape)
        churning = np.maximum(churning, amp(churn_db) * shape)
    spraying = splashing * amp(spray_db + spray_db_per_cm * height_cm)  # a longer fall throws more
    spraying *= (splashing / amp(full_flow_db)) ** 0.2  # a trickle throws little
    hiss = 0.18 + 0.064 * height_cm
    low_swarm = fizz(255, 1055, cycles=13.5, spread_db=1.5, count=1500)
    churn = coloured(low_swarm + hiss * rush(CHURN_SPECTRUM), CHURN_SPECTRUM)
    mid_swarm = fizz(1029, 5070, cycles=30, spread_db=2.3, count=9000)
    splash = unit(coloured(mid_swarm, SPLASH_SPECTRUM) + hiss * rush(SPLASH_SPECTRUM))
    high_swarm = fizz(3874, 18560, cycles=44, spread_db=4.6, count=12000)
    spray = unit(coloured(high_swarm, SPRAY_SPECTRUM) + hiss * rush(SPRAY_SPECTRUM))
    breakup = amp(3.1 * wobble(150))  # the stream breaks into drops
    return churning * churn + breakup * (splashing * splash + spraying * spray)


def slaps(gulp_thud_db=-35):
    """Liquid slaps the pool and snaps shut behind each gulp; small, high slaps thud less and tick more."""
    thud_db = lambda hz, db: db - 10.5 - 5 * np.log2(hz / 2000)
    tick_db = lambda hz, db: db - 16.5 + 13 * np.log2(hz / 2000)
    on_pool = [(s, hz, db, thud_db(hz, db), tick_db(hz, db)) for s, hz, db in SLAPS]
    at_neck = [(s, hz, db, gulp_thud_db, tick_db(hz, db)) for s, hz, db in GULPS]
    pool = impacts(on_pool, t60=0.027, grit=0.19, width=0.84,
                   thud_hz=526, tick_hz=6000, pan_db=-2.5, tick_t60=0.015)
    neck = impacts(at_neck, t60=0.039, grit=0.19, width=0.79,
                   thud_hz=410, tick_hz=6030, pan_db=-2.5, tick_t60=0.039)
    return pool + neck


def large_bubbles(ring_db=-1, pop_db=-30, shed_db=-13, shed_s=0.023, count=2):
    """Bubbles pinch off with a pop, flutter as the surface rocks, and shed smaller, higher ones."""
    out, t = np.zeros((2, N)), seconds(.12)
    for s, hz, db, cycles in BUBBLES:
        flutter = 1 + 0.46 * np.sin(2 * np.pi * (rng.uniform(55, 125) * t + rng.random()))
        ring = flutter * bubble(t, hz, cycles / hz, BUBBLE_RISE * rng.random())
        add(out, s, amp(db + ring_db) * ring, rng.standard_normal() - 1)
        pop = burst(lambda f: resonance(f, 2 * hz, 2 * hz), t60=0.02, grit=0.11)
        add(out, s, amp(db + pop_db) * pop)
        for delay, pitch in rng.random((count, 2)):
            small_hz = hz * 2 ** pitch
            small = bubble(t, small_hz, cycles / small_hz, DROP_RISE)
            add(out, s + shed_s * delay, amp(db + shed_db) * small, pan_db=-1)
    return out


def glugs(hz=320, t60=0.087, swell_s=0.028, sag=0.57, settle_s=0.0048, note_db=-21, db_per_cm=0.5):
    """Each gulp, about the same amount of air, swells into a low note that sags as the pocket grows."""
    out, t = np.zeros((2, N)), seconds(.2)
    envelope = fade(t, t60) * (1 - np.exp(-t / swell_s))
    glide = t + sag * settle_s * (1 - np.exp(-t / settle_s))
    for s, _, _ in GULPS:
        db = note_db + db_per_cm * np.interp(s, *np.transpose(NECK_HEIGHT))  # a raised neck carries better
        note_hz = hz * rng.normal(1, 0.081)
        add(out, s, amp(db) * np.sin(2 * np.pi * note_hz * glide) * envelope)
    return out


def scene():
    """The bottle is handled in the open; the liquid reaches the microphones from inside the crate."""
    plastic = from_left(plastic_snaps() + knocks(), lead_s=3e-5)
    trapped_air = glugs() + large_bubbles() + gurgles() + chirps()
    liquid = from_left(slaps() + spatters() + trapped_air + stream() + foam(), lead_s=1.5e-5)
    early = crate_ring(liquid) + wall_echo(amp(-6) * plastic + liquid)
    tail = room_tail(amp(-3.5) * plastic + amp(-4.5) * liquid)
    return plastic + liquid + early + tail + bottle_handling() + room_tone()


def record(dry, top_hz=16000):
    """The two microphones differ a little in colour; nothing above the band limit is kept."""
    sides = np.array([[1], [-1]])
    return filtered(dry, lambda hz: amp(along(MIC_BALANCE, hz) * sides / 2) * (hz < top_hz))


dry = scene()
out = record(dry)
file_out(out)
```